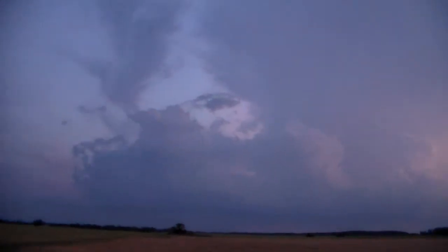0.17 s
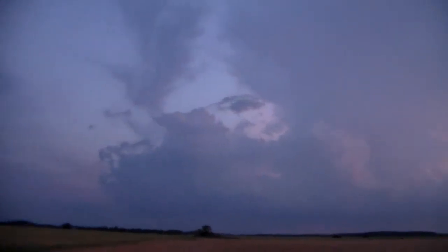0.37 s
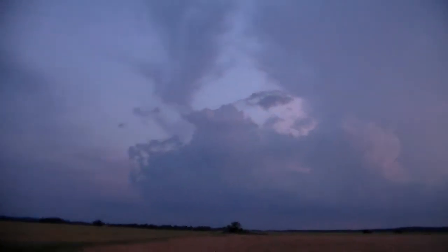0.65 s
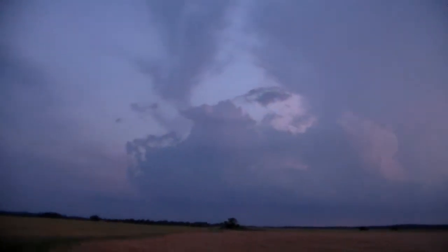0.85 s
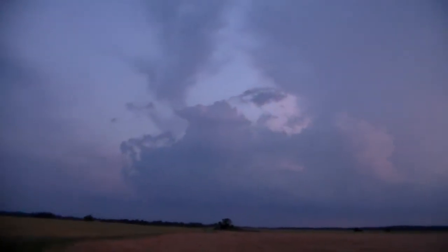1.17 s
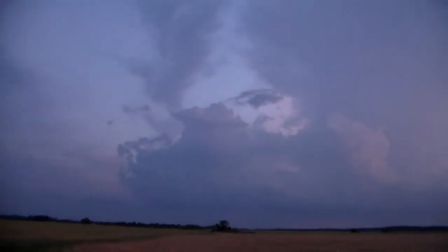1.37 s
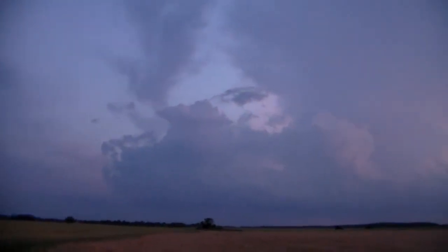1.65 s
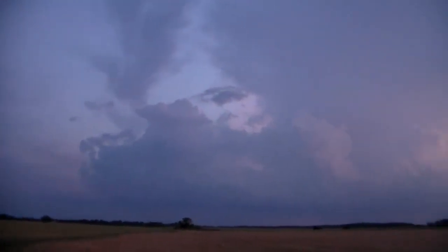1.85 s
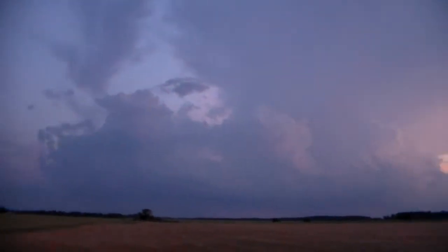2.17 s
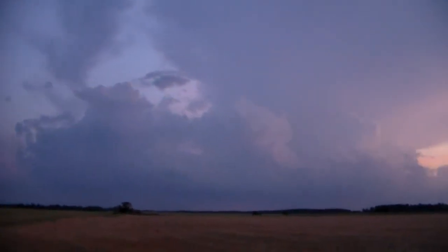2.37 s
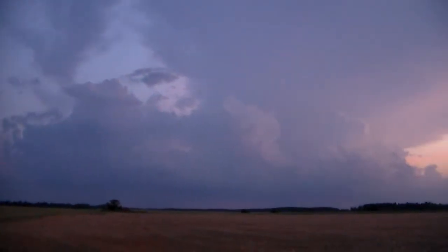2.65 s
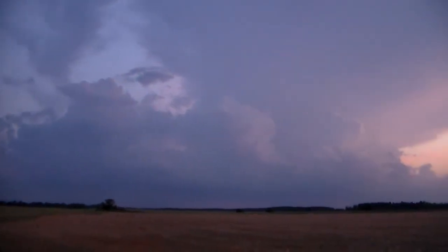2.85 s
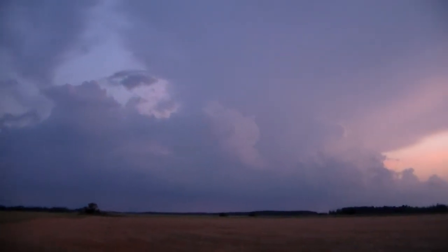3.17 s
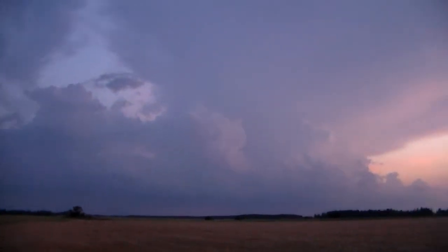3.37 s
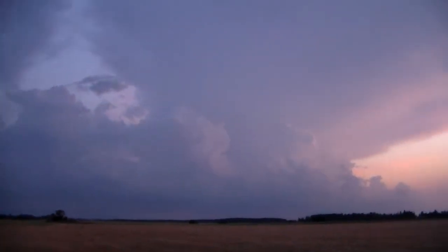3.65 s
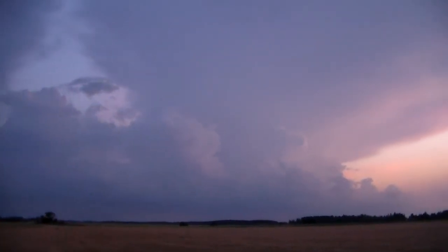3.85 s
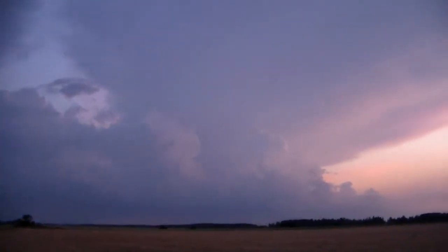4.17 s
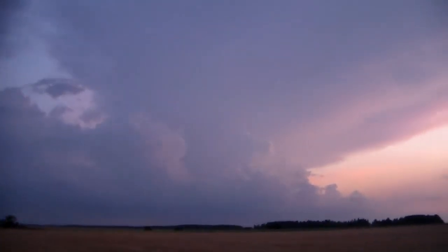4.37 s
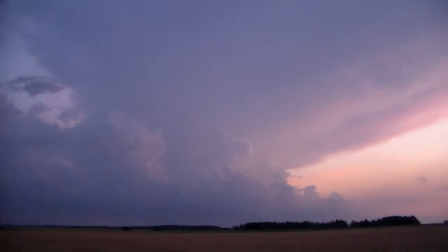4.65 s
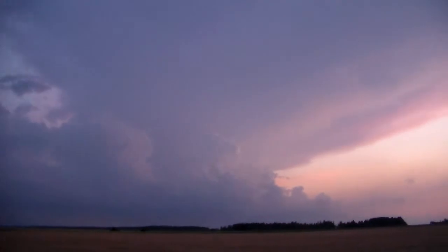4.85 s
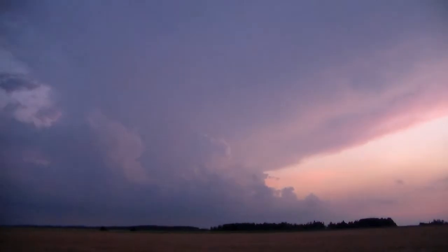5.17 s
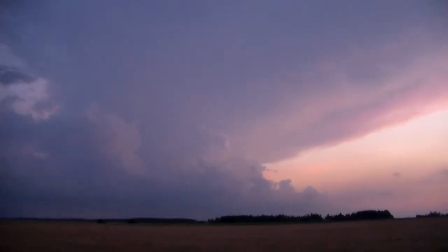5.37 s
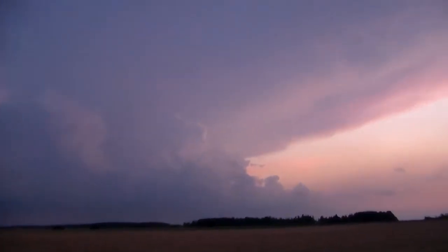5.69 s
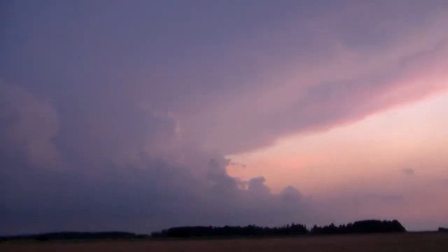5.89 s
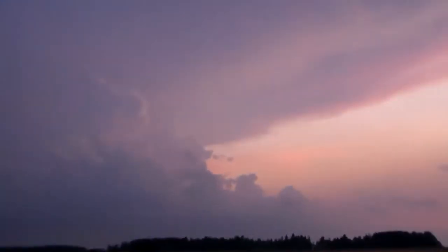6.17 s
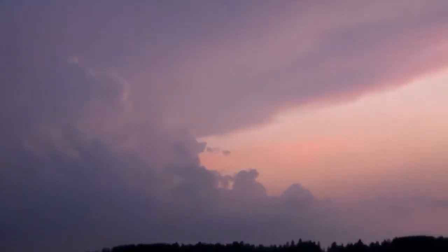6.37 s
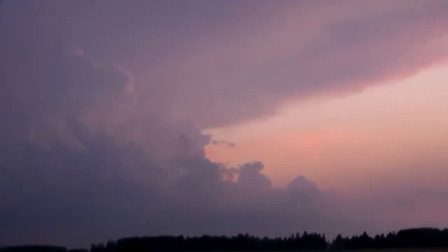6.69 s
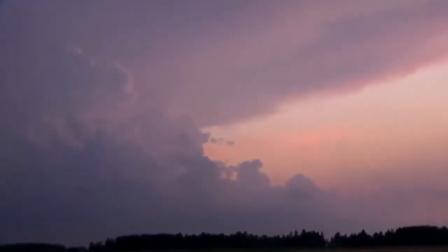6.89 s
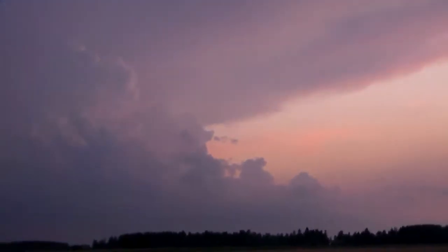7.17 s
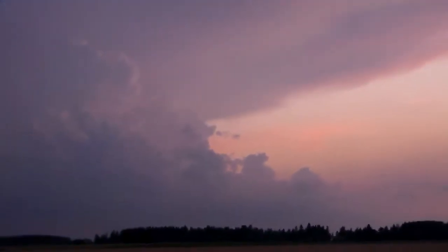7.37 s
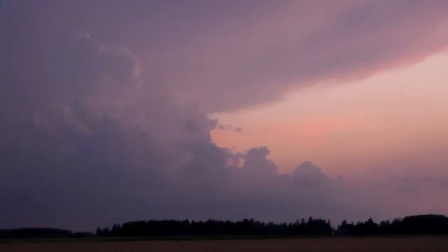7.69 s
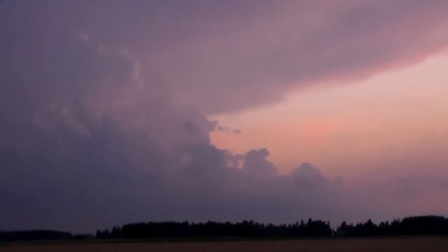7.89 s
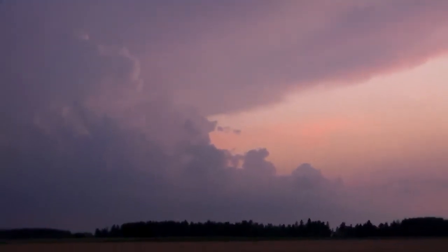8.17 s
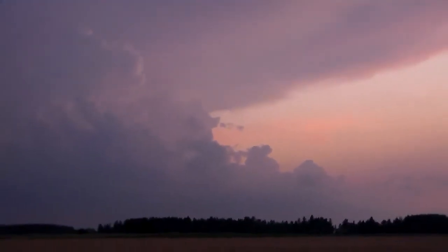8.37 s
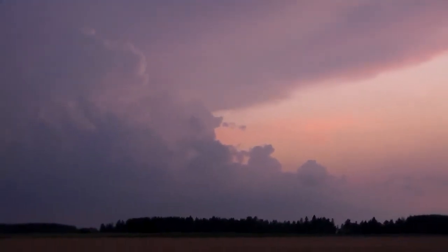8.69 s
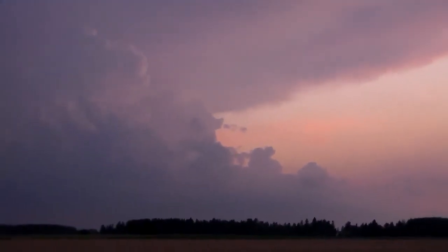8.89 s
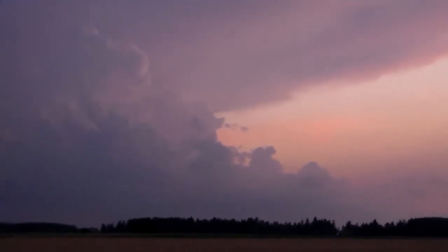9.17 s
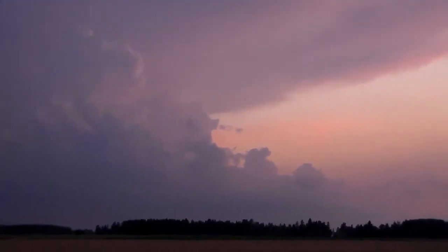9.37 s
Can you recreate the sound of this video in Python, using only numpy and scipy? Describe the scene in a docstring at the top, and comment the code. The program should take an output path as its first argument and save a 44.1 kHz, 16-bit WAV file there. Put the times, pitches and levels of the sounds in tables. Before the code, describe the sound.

Shrill insect chorus pulsing rapidly at dusk, with rumbling gusts on a handheld camera, one sharp snap midway, a short motor buzz, then stronger wind thumps.

```python
"""Open field at dusk: bush-crickets saw in a fast throb over a quiet rush, gusts buffet a hand-held camera.
Rush: coloured noise. Gusts: separate eddies at the two ports. Crickets: tooth clicks and hiss, gated by
drifting strokes, in bands by singer size. Housing ticks, a button snap and a stepping lens motor: struck
modes plus creaking bursts; a gritty rustle and grind goes with them. The gain control ducks after the
first overload and comes part of the way back."""
import sys
import numpy as np
from scipy import signal
from scipy.fft import rfft, irfft, next_fast_len
from scipy.io import wavfile
from scipy.ndimage import uniform_filter1d, map_coordinates

SR = 44100
rng = np.random.default_rng(int(sys.argv[2]) if len(sys.argv) > 2 else 0)


def generate_wav(sig):
    """Save sig (samples, or channels by samples) to the path in sys.argv[1] as 16-bit PCM at SR."""
    pcm = np.round(np.clip(np.atleast_2d(sig).T, -1, 1) * 32767).astype(np.int16)
    wavfile.write(sys.argv[1], SR, pcm)


N = 420273
SIZE = next_fast_len(N)


def undb(db):
    """dB to amplitude gain."""
    return 10 ** (np.asarray(db) / 20)


def curves(table):
    """Columns of a table against time, one value per sample."""
    s, *columns = np.transpose(table)
    return [np.interp(np.arange(N) / SR, s, column) for column in columns]


def on_log(points):
    """(Hz, value) points read at every FFT bin, linear in log frequency."""
    hz, value = np.transpose(points)
    bin_hz = np.arange(SIZE // 2 + 1) * SR / SIZE
    return np.interp(np.log(bin_hz + 1), np.log(hz + 1), value)


def shape(spectrum, points):
    """Spectrum back to sound through a (Hz, dB) colour; rms 1."""
    y = irfft(spectrum * undb(on_log(points)), SIZE)[..., :N]
    return y / np.sqrt(np.mean(y ** 2))


def walk(rate_hz):
    """Random levels held 1 / rate_hz and smoothed twice; standard deviation about 0.74."""
    k = int(SR / rate_hz)
    held = np.repeat(rng.standard_normal(N // k + 1), k)
    return uniform_filter1d(uniform_filter1d(held, k), k)[:N]


def add(out, start_s, sound, db, pan_db):
    """Mix a short sound into both channels; pan_db is left minus right."""
    i = int(start_s * SR)
    gains = undb(db + np.array([[pan_db], [-pan_db]]) / 2)
    out[:, i:i + len(sound)] += (gains * sound)[:, :N - i]


def ring(modes, rise_ms=0.16):
    """Struck (Hz, dB, t60 s) modes: decaying sines with a soft onset, 80 ms."""
    t = np.arange(int(.08 * SR)) / SR
    out = 0
    for hz, db, t60_s in modes:
        decay = np.exp(-np.log(1000) * t / t60_s)
        out = out + undb(db) * np.sin(2 * np.pi * hz * t) * decay
    return out * (1 - np.exp(-t * 1000 / rise_ms))


def decaying_grit(length, ms):
    """White noise falling to 1/e in ms."""
    return rng.standard_normal(length) * np.exp(-np.arange(length) * 1000 / (ms * SR))


def scrape(sound, ms):
    """Rough contact: the blow is spread over a gritty burst; the peak stays."""
    rough = np.convolve(sound, decaying_grit(900, ms))
    return rough * np.abs(sound).max() / np.abs(rough).max()


def crack(band_hz, ms):
    """Dense burst of plastic creak: band-passed decaying noise; peak 1."""
    band = signal.butter(2, band_hz, "band", fs=SR, output="sos")
    burst = signal.sosfilt(band, decaying_grit(2000, ms))
    return burst / np.abs(burst).max()


# Rush spectrum. Each row: frequency in Hz, relative density in dB per Hz.
AIR_SPECTRUM_DB = [(90, -12), (150, -8), (300, -10), (480, -8.5), (540, -9.5), (630, -8.5), (830, -9.5),
                   (1120, -8.5), (1350, -13.5), (1700, -16.5), (2500, -18.5), (4000, -19.5), (5200, -16.5),
                   (6000, -17.5), (9000, -55), (14000, -52)]
# Likeness of the two channels. Each row: frequency in Hz, correlation 0-1.
AIR_CORRELATION = [(150, 0.3), (300, 0.4), (700, 0.75), (1500, 0.74), (3000, 0.87), (6000, 0.2)]
# Slowly sinking rush. Each row: time in seconds, level in dB.
AIR_LEVEL_DB = [(0, -50.5), (2.0, -53.5), (5.0, -54), (9.53, -54)]


def air():
    """Rush of the field plus the camera's hiss: noise, partly shared by the channels."""
    alike = np.clip(on_log(AIR_CORRELATION), 0, 1)
    mid, side = rfft(rng.standard_normal((2, N)), SIZE)
    common = np.sqrt(1 + alike) * mid
    opposed = np.sqrt(1 - alike) * side * np.array([[1], [-1]])
    pair = shape(common + opposed, AIR_SPECTRUM_DB)
    return pair * undb(curves(AIR_LEVEL_DB)[0] + .7 * walk(7))


def puff(hz, tip):
    """Eddy passing a port: suction with a rise on either side and a share of sharper tip; peak -1."""
    u = np.arange(-SR / hz, SR / hz) * np.pi * hz / SR
    broad = (2 * u ** 2 - 1) * np.exp(-u ** 2)
    sharp = (18 * u ** 2 - 1) * np.exp(-9 * u ** 2)
    return (1 - tip) * broad + tip * sharp


# Gusts. Each row: time in seconds, left port rms in dB, right port rms in dB, both before flicker.
GUSTS_DB = [(0, -54, -48.5), (.33, -42, -46), (.6, -47.5, -45), (.9, -48, -47), (2.0, -50, -50),
            (2.55, -44.5, -49), (3.3, -53, -50), (3.92, -43, -46), (4.1, -47.5, -51.5),
            (4.24, -38.5, -42.5), (4.41, -37.5, -40), (4.53, -47, -47), (4.75, -50, -49), (5.1, -48, -51.5),
            (5.25, -48, -46), (5.36, -44, -42), (5.5, -45, -44), (5.58, -47.5, -49), (5.9, -43.5, -45),
            (6.25, -39, -38.5), (6.65, -43, -46), (7.05, -42, -43), (7.32, -31.5, -34.5), (8.0, -35.5, -38),
            (8.3, -36, -41), (8.7, -41.5, -46), (9.0, -40.5, -43), (9.53, -39.5, -42.5)]
FLICKER_DB, FLICKER_HZ = 3.5, 11.  # dB per unit of walk


def gusts(eddies_per_s=160, calm_hz=34.3, rise=0.3, spread=0.301, scatter_db=4.0):
    """Unrelated eddies at each port; stronger wind makes them shorter and higher."""
    out = np.zeros((2, N + SR))
    for port, gust_db in zip(out, curves(GUSTS_DB)):
        level_db = gust_db + FLICKER_DB * walk(FLICKER_HZ)
        starts = rng.integers(0, N, int(eddies_per_s * N / SR))
        for i, (pitch, size, sign) in zip(starts, rng.standard_normal((9999, 3))):
            hz = calm_hz * undb(rise * (level_db[i] + 49.5)) * np.exp(spread * pitch)
            eddy = puff(max(hz, 12.), tip=0.12)
            # the offset favours suction
            port[i:i + len(eddy)] += eddy * undb(scatter_db * size) * np.sign(sign + 0.36)
        # even out the running level, then impose the gusts
        running_rms = np.sqrt(uniform_filter1d(port[:N] ** 2, SR // 6) + 1e-3)
        port[:N] *= undb(level_db) / running_rms
    return out[:, :N]


# Single hard puffs. Each row: centre in seconds, port (0 left, 1 right), peak in dB, pitch in Hz,
# sign (1 push, -1 suction).
PUFFS = [(4.284, 0, -33, 69, -1), (4.303, 1, -38, 53, 1), (4.355, 1, -28.5, 85, -1),
         (4.461, 0, -21, 190, -1), (4.439, 0, -25, 95, -1), (3.911, 0, -31, 70, 1), (3.921, 0, -35, 50, -1),
         (3.977, 0, -35, 90, -1), (4.035, 0, -31.5, 109, 1), (4.2, 0, -28, 74.5, -1),
         (4.15, 1, -35, 60, -1), (2.62, 0, -38, 90, -1), (4.236, 1, -37, 54, -1), (4.479, 1, -26, 61, -1),
         (4.621, 0, -28, 34.5, 1), (5.304, 1, -29, 43, 1), (5.415, 1, -34, 55, -1), (6.286, 1, -30, 44, -1),
         (6.332, 1, -29, 43, 1), (6.487, 1, -35, 80, -1), (6.547, 1, -33, 64, -1), (6.547, 0, -31, 70, -1),
         (6.552, 0, -29.5, 89, 1), (6.664, 0, -25, 70, 1), (6.686, 0, -29, 60, -1), (6.701, 0, -30, 65, 1),
         (6.708, 1, -32, 57, -1), (6.859, 0, -25.5, 55, -1), (7.038, 0, -28, 95, -1),
         (7.145, 0, -23.5, 78, 1), (7.28, 0, -19.5, 96, -1), (7.288, 1, -24, 61.6, 1),
         (7.331, 0, -25, 87, 1), (7.347, 1, -34, 61, -1), (7.386, 0, -26, 122, -1), (7.423, 1, -35, 68, 1),
         (7.424, 0, -30, 110, 1), (7.463, 1, -25, 101.6, -1), (7.564, 0, -25, 68, -1),
         (7.59, 1, -36, 70, -1), (7.778, 1, -23, 52, -1), (7.956, 1, -26, 66, -1),
         (7.973, 0, -18.5, 87, -1), (8.172, 0, -22, 66, 1), (8.283, 0, -23.5, 56, -1),
         (8.403, 1, -26, 53, -1), (8.554, 0, -29, 78, -1), (8.573, 1, -24, 55, -1), (8.878, 0, -28, 53, -1),
         (9.216, 0, -28.5, 73, -1), (7.738, 0, -23, 110, -1), (7.794, 0, -20, 114, 1),
         (7.996, 0, -18, 110, 1), (8.003, 0, -16, 100, -1), (8.231, 1, -35, 70, -1),
         (8.015, 1, -21, 63, -1), (8.209, 0, -22, 35, -1), (8.386, 0, -20, 78.5, -1),
         (8.986, 0, -27.5, 92, -1), (9.462, 0, -28, 61, -1)]
PUFF_TIP_HZ = 23.2


def hard_puffs():
    """Strong eddies hit one port each; slow ones have more of the sharp tip."""
    out = np.zeros((2, N + SR))
    for centre_s, port, db, hz, push in PUFFS:
        eddy = puff(hz, tip=min(PUFF_TIP_HZ / hz, .6) ** 2)
        i = int(centre_s * SR) - len(eddy) // 2
        out[int(port > .5), i:i + len(eddy)] -= np.sign(push) * undb(db) * eddy
    return out[:, :N]


FADE_DB = 31


def swell(start_s, end_s, db, fade_in_s, fade_out_s):
    """Gain that fades in, holds and fades out to silence."""
    edges_s = [start_s - fade_in_s, start_s, end_s, end_s + fade_out_s]
    floor_db = db - FADE_DB
    gain = undb(np.interp(np.arange(N) / SR, edges_s, [floor_db, db, db, floor_db]))
    return gain - undb(floor_db)


# Finger rustle before the snap, then gear grind. Each row: hold start in seconds, hold end in seconds,
# nominal level in dB, fade in in seconds, fade out in seconds.
GRIND = [(5.505, 5.666, -52, 0.097, 0.057), (5.634, 6.505, -51.5, 0.021, 0.075)]
# Grind spectrum. Each row: frequency in Hz, relative density in dB per Hz.
GRIND_SPECTRUM_DB = [(500, -12.5), (1000, -3), (1500, -10.5), (2500, -8), (3800, -5.5), (5000, -17)]


def rustle_and_grind():
    """Fingers rustle and gears grind: coloured noise with fast random level changes."""
    gritty = rng.standard_normal(N) * undb(5 * walk(300))
    grind = shape(rfft(gritty, SIZE), GRIND_SPECTRUM_DB)
    return grind * sum(swell(*row) for row in GRIND) * undb([[.7], [-.7]])


# Housing modes. Each row: multiple of the tick's pitch, level in dB, multiple of the tick's t60.
SHELL_MODES = [(0.46, -10, 1.3), (0.57, -12, .9), (1, -1, 1), (1.22, 0, 0.55), (1.36, -1, 0.45),
               (2.2, -12, .3)]
# Housing ticks. Each row: start in seconds, level in dB, ring in Hz, t60 in seconds,
# crack level relative to the tick level in dB, crack top in Hz, left minus right in dB.
TICKS = [(0.135, -40.5, 2830, 0.011, -4, 3300, 2), (0.1418, -45, 1800, 0.0055, -4, 2800, -5),
         (0.168, -46, 1000, 0.0088, -13, 2000, 8), (0.398, -49, 1650, 0.02, -2, 2200, -2.5),
         (0.421, -40.5, 1750, 0.0073, -7, 2800, 3), (0.46, -37.5, 1800, 0.005, -7, 4500, -3),
         (2.6148, -44, 2740, 0.012, 2, 4500, 0), (5.5234, -42, 2740, 0.014, 2, 4000, 3),
         (5.5731, -17.5, 2225, 0.016, -17, 2700, 5), (5.591, -41, 2310, 0.015, 0, 3500, 8),
         (6.4963, -37.5, 980, 0.055, -8, 2210, 11), (6.5, -39, 1780, 0.022, 3, 4200, 5),
         (6.5035, -41, 3500, 0.017, 1, 3900, 7), (6.5748, -42, 4400, 0.012, 3, 4800, 0),
         (6.776, -44, 2600, .008, 0, 4000, 0), (8.2153, -39, 2000, 0.011, 3, 5000, 4),
         (9.014, -45, 3160, 0.009, 8, 6500, 5)]
CRACK_LOW_HZ, CRACK_MS = 1300, 6.5


def housing_ticks():
    """The shell rings from a rough blow while the plastic cracks."""
    out = np.zeros((2, N))
    for start_s, db, hz, t60_s, crack_db, top_hz, pan_db in TICKS:
        shell = ring([(multiple * hz, mode_db, share * t60_s) for multiple, mode_db, share in SHELL_MODES])
        add(out, start_s, scrape(shell, ms=0.17), db, pan_db)
        add(out, start_s, crack((CRACK_LOW_HZ, top_hz), CRACK_MS), db + crack_db, pan_db)
    return out


# Button modes. Each row: frequency in Hz, level in dB, t60 in seconds.
SNAP_MODES = [(1050, -16, .008), (1750, -11, .004), (2760, -8, .008), (3150, -1, .012), (3760, -7, .007),
              (4320, -7, .008), (5200, -9, .003), (5950, -8, .005), (6300, -6, .005), (6820, -5, .005),
              (7890, -5, .004), (8870, -5, .003), (10300, -4, .002), (12500, -12, .0015)]
STIFF_MS = .42


def contact():
    """The button's ring; its stiff mount passes no thump, so the moving mean is removed."""
    click = ring(SNAP_MODES, rise_ms=.03)
    return click - uniform_filter1d(click, int(STIFF_MS * SR / 1000), mode="constant")


# Button contacts. Each row: start in seconds, level in dB.
SNAP = [(5.6402, -36), (5.644, -25), (5.6447, -27), (5.6456, -12.5), (5.648, -27), (5.6508, -29)]
SNAP_PAN_DB = 5
CHATTER_DB, CHATTER_MS, CHATTER_HZ = -16, 6.5, (2700, 7500)


def button_snap():
    """The button bounces through several contacts; a chatter starts with the second, just before the hardest."""
    out = np.zeros((2, N))
    for start_s, db in SNAP:
        add(out, start_s, contact(), db, SNAP_PAN_DB)
    add(out, SNAP[1][0], crack(CHATTER_HZ, CHATTER_MS), CHATTER_DB, SNAP_PAN_DB)
    return out


# Motor body modes, before detuning. Each row: frequency in Hz, level in dB, t60 in seconds.
MOTOR_RING = [(1118, 7.5, 0.036), (1065, 0, 0.025), (997, 7, 0.025), (1220, -15, 0.015)]
# Motor rattle modes. Each row: frequency in Hz, level in dB, t60 in seconds.
MOTOR_RATTLE = [(2020, -6, 0.007), (2720, -1, 0.0064), (3380, -2, 0.007)]
# Starting jolt, quiet run, louder labour, one slip. Each row: step number, ring level in dB,
# rattle level in dB, both before scatter.
MOTOR_LOAD = [(0, -41, -53), (1, -64, -57), (7, -49, -54), (11, -39.5, -52), (13, -43, -45),
              (14, -37.5, -48), (15, -35.5, -45), (17, -34.5, -38), (17.9, -36, -48), (18.8, -43, -33.5),
              (19.8, -36.5, -37), (21, -34.5, -36)]
MOTOR_START_S, MOTOR_STEP_S, MOTOR_STEPS = 5.6965, .03712, 22
RING_SCATTER_DB, RATTLE_SCATTER_DB = 1.2, 1.5
MOTOR_DETUNE, MOTOR_CRACK_DB, MOTOR_PAN_DB = .008, -3, 1.4


def lens_motor():
    """Each evenly timed step strikes the detuned body modes, a rattle and a creak."""
    out = np.zeros((2, N))
    at, *load = np.transpose(MOTOR_LOAD)
    steps = np.transpose([np.interp(np.arange(MOTOR_STEPS), at, db) for db in load])
    scatter_db = np.array([RING_SCATTER_DB, RATTLE_SCATTER_DB])
    steps = steps + scatter_db * rng.standard_normal((MOTOR_STEPS, 2))
    for step, (ring_db, rattle_db) in enumerate(steps):
        start_s = MOTOR_START_S + step * MOTOR_STEP_S
        detune = 1 + MOTOR_DETUNE * rng.standard_normal(len(MOTOR_RING))
        body = [(hz * k, db, t60_s) for (hz, db, t60_s), k in zip(MOTOR_RING, detune)]
        add(out, start_s, scrape(ring(body, rise_ms=2.3), ms=1.3), ring_db, MOTOR_PAN_DB)
        add(out, start_s, scrape(ring(MOTOR_RATTLE), ms=1.7), rattle_db, MOTOR_PAN_DB)
        add(out, start_s, crack((1500, 4200), ms=7.2), rattle_db + MOTOR_CRACK_DB, MOTOR_PAN_DB)
    return out


# Loudest singers, each at a steady pace. Each row: strokes per second, strokes ahead at the start,
# weight in the throb from the side 0-1, weight in the throb from all round 0-1.
SINGERS = [(23.095, .042, .45, .07), (23.83, -.302, .28, .07), (22.853, .39, .26, .16),
           (22.7, .09, .11, .09), (21.99, -.15, .07, .12), (23.886, -.284, .13, .02),
           (23.531, -.34, .11, 0), (22.62, -.41, 0, .27), (23.25, -.15, .03, .11)]


def chorus_beat(weights):
    """Singers drift in and out of step: their common beat in strokes, and how far they agree."""
    t = np.arange(N) / SR
    together = 0
    for (strokes_hz, ahead, *_), weight in zip(SINGERS, weights):
        together = together + weight * np.exp(2j * np.pi * (strokes_hz * t + ahead))
    return np.angle(together) / (2 * np.pi), np.abs(together)


# Singers by size, large to small. Each row: wing resonance in Hz, hold on the beat 0-1, strokes behind.
SIZES = [(7550, 0.93, 0), (8600, 1, 0.005), (10100, .92, 0.015), (12200, .8, 0.034)]


def throbs(weights, depth, sharp=2.8, loose=0.02):
    """Power over the strokes for each size of singer; they keep the beat loosely."""
    beat, unison = chorus_beat(weights)
    out = []
    for _, hold, behind in SIZES:
        phase = 2 * np.pi * (beat - behind - loose * walk(5.9))
        stroke = np.exp(sharp * np.cos(phase)) / np.i0(sharp)  # mean 1
        share = np.clip(hold * depth * unison * undb(1.7 * walk(14)), 0, 1)
        out.append(1 - share + share * stroke)
    return out


def saw(throb, teeth_per_s, far):
    """Spectrum of file teeth clicking, densest in mid-stroke; far singers blur into a hiss."""
    struck = rng.random(N) < throb * teeth_per_s / SR
    teeth = struck * rng.standard_normal(N) * np.sqrt(SR / teeth_per_s)
    hiss = np.sqrt(throb) * rng.standard_normal(N)
    return rfft(np.sqrt(1 - far) * teeth + np.sqrt(far) * hiss, SIZE)


# Chorus spectrum. Each row: frequency in Hz, relative density in dB per Hz.
WING_SPECTRUM_DB = [(3290, -28.5), (5600, -29), (6630, -15), (7370, 0), (8320, 5), (10100, 3.5),
                    (12300, -7), (13600, -11), (14300, -12)]
# Chorus brightness as the camera turns. Each row: time in seconds, tilt about 9 kHz in dB per octave.
TILT = [(0, -1), (.8, -3), (1.8, -1.5), (2.8, 0.5), (3.6, 1.5), (4.5, 1.5), (5.4, -2), (6.5, 0.1), (8, 1.5),
        (9.53, 0.8)]
WING_OCTAVES, DRIFT_DB = .16, 1.23  # band width; dB per unit of walk


def wings(size_throbs, teeth_per_s, far):
    """Each size of singer rings its own band and swells on its own; rms 1."""
    octaves = on_log([(1, 0), (2 ** 15, 15)])
    bands = [np.exp(-.5 * ((octaves - np.log2(hz)) / WING_OCTAVES) ** 2) for hz, *_ in SIZES]
    bands = np.array(bands) + 1e-9
    bands = np.sqrt(bands / bands.sum(axis=0))  # powers add to 1
    tilt_db = curves(TILT)[0]
    song = 0
    for band, throb, (hz, *_) in zip(bands, size_throbs, SIZES):
        swell_db = tilt_db * np.log2(hz / 9000) + DRIFT_DB * walk(1.6)
        power = throb * undb(2 * swell_db)
        song = song + band * saw(power, teeth_per_s, far)
    return shape(song, WING_SPECTRUM_DB)


# Whole chorus as the camera turns. Each row: time in seconds, level in dB, left minus right in dB.
CHORUS = [(0, -32, 0.5), (.8, -29, 0.5), (1.6, -28.5, 0.7), (2.2, -30, 0.9), (3.1, -29, 1.5),
          (3.45, -30.5, 1.0), (4.3, -29, 1.0), (4.9, -30, 1), (5.6, -30, -0.5), (6.0, -30, 0),
          (6.7, -30.5, 0), (7.6, -30, 1), (8.5, -30, 0.5), (9.0, -30.5, 0), (9.53, -30.5, 0.5)]
# Lag between the ports as the camera turns. Each row: time in seconds, right port late in microseconds.
PORT_LAG_US = [(0, 52), (1.5, 47), (3.5, 57.2), (5.5, 64), (9.5, 60)]


def crickets(direct=0.56):
    """Singers in step throb together: direct sound late at the right port, the rest from all round."""
    level_db, pan_db = curves(CHORUS)
    side_weights, round_weights = np.transpose(SINGERS)[2:]
    near = wings(throbs(side_weights, depth=.8), teeth_per_s=700., far=0.41)
    read_at = np.arange(N) - curves(PORT_LAG_US)[0] * SR / 10 ** 6
    late = map_coordinates(near, [read_at], order=5, mode="nearest")
    all_round = throbs(round_weights, depth=0.69)
    around = [wings(all_round, teeth_per_s=2500., far=0.72) * undb(0.67 * walk(14)) for _ in range(2)]
    song = np.sqrt(direct) * np.array([near, late]) + np.sqrt(1 - direct) * np.array(around)
    return song * undb(level_db + np.array([pan_db, -pan_db]) / 2)


def scene():
    """Field, wind, camera and crickets together."""
    wind = gusts() + hard_puffs()
    camera = rustle_and_grind() + housing_ticks() + button_snap() + lens_motor()
    return air() + wind + camera + crickets()


# Gain control. Each row: seconds since the first overload, gain in dB.
DUCK = [(0, 0), (.004, -4), (.012, -15), (.415, -15), (.595, -5)]
OVERLOAD, TOP_HZ = .26, 14150  # amplitude in the detector's band; top cut


def record(dry):
    """Gain drops after the first overload, holds and comes part of the way back; the top is cut."""
    # the detector listens to the middle band only
    heard = signal.sosfilt(signal.butter(2, (500, 6000), "band", fs=SR, output="sos"), dry)
    over = np.flatnonzero(np.abs(heard).max(axis=0) > OVERLOAD)
    since_s = (np.arange(N) - (over[0] if len(over) else N)) / SR
    gain = undb(np.interp(since_s, *np.transpose(DUCK)))
    return signal.sosfilt(signal.ellip(11, .2, 70, TOP_HZ, fs=SR, output="sos"), dry * gain)


dry = scene()
out = record(dry)
generate_wav(out)
```